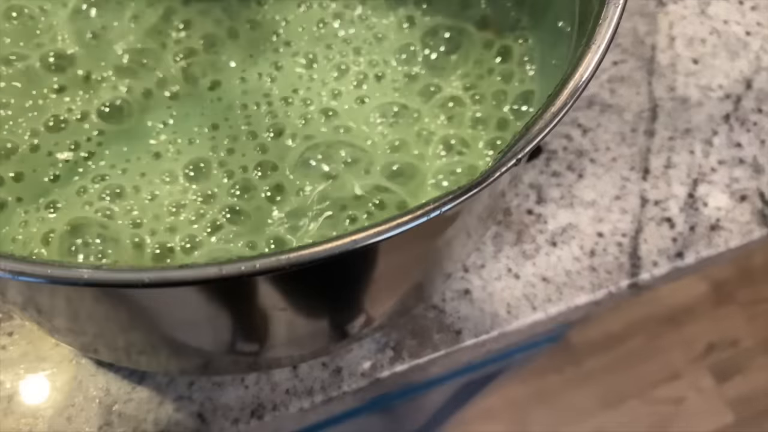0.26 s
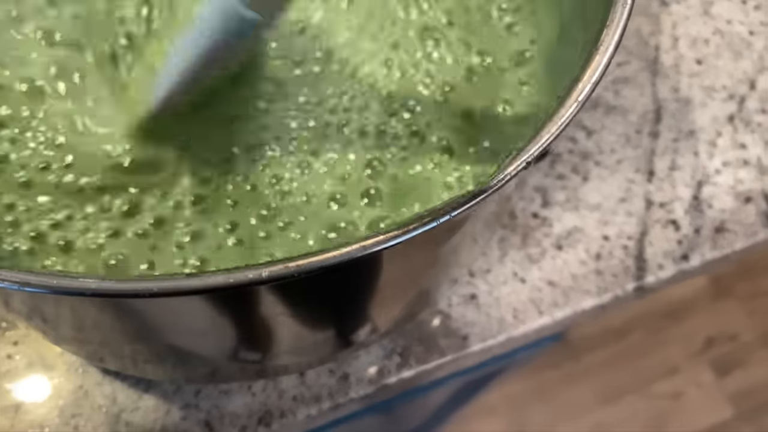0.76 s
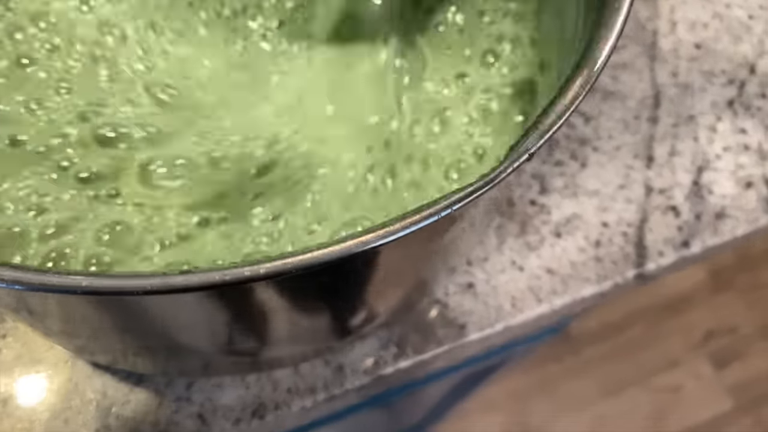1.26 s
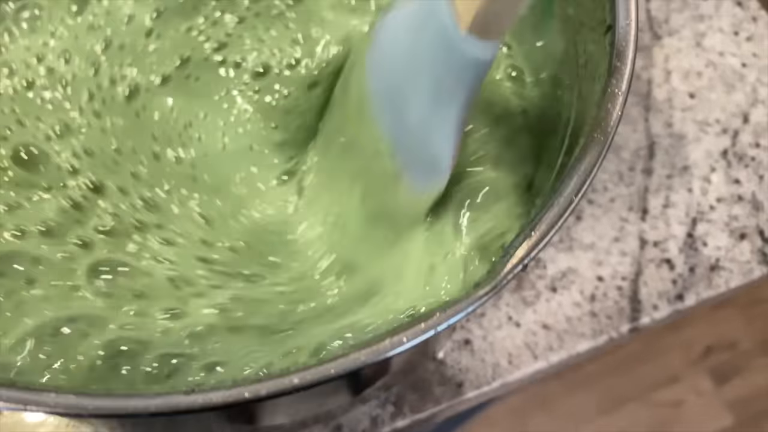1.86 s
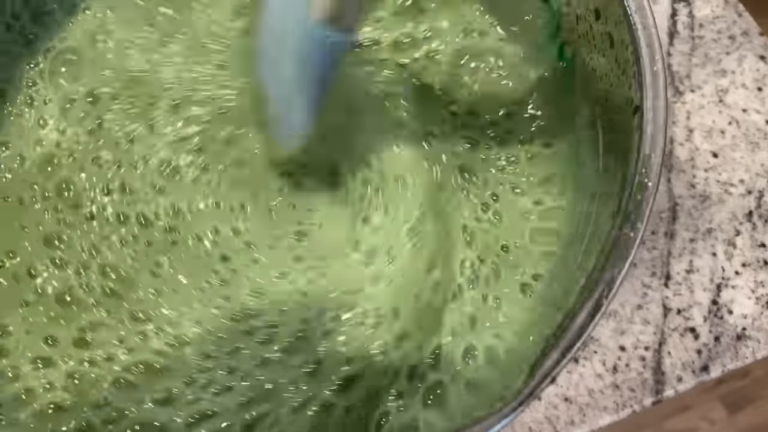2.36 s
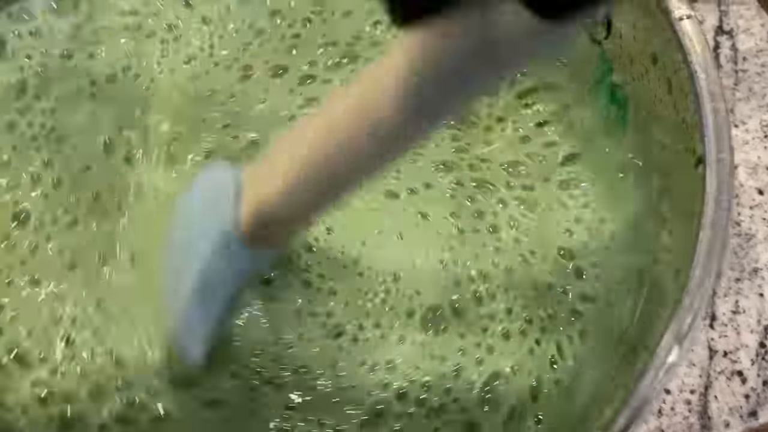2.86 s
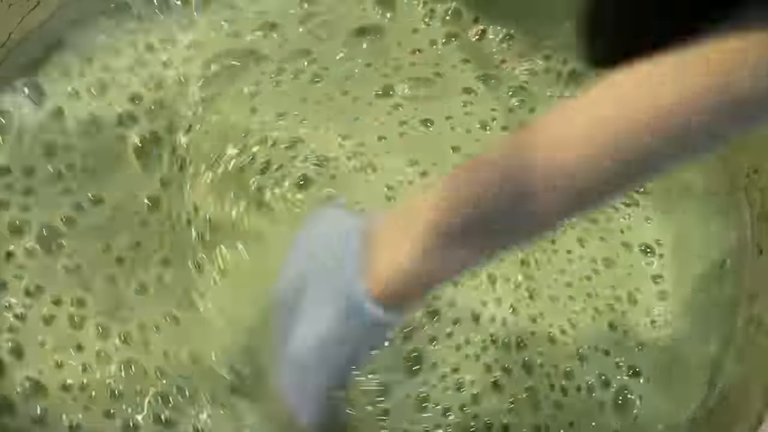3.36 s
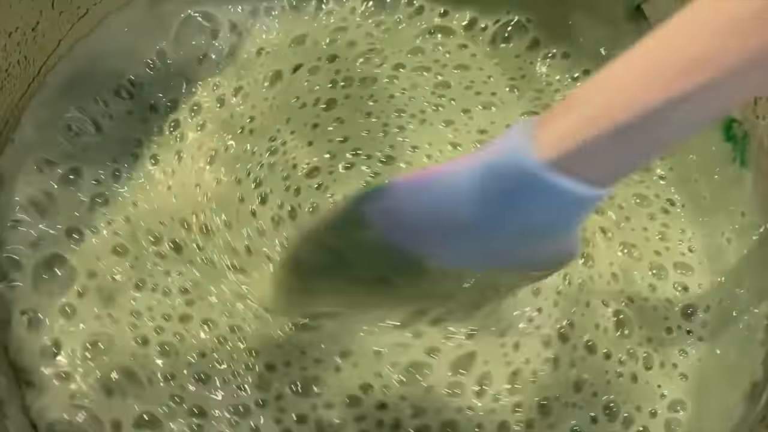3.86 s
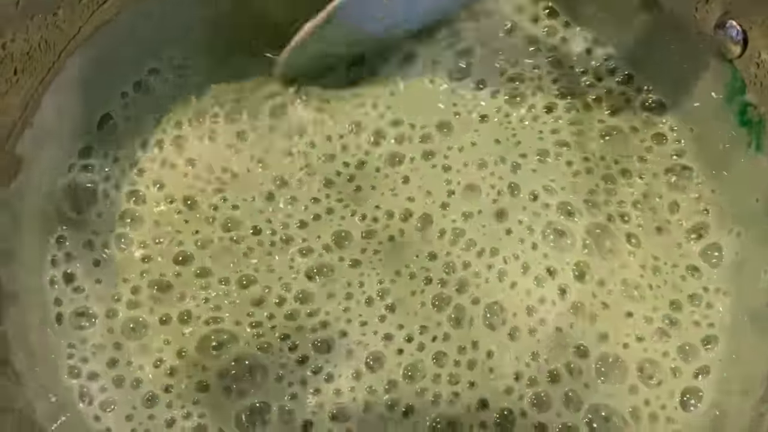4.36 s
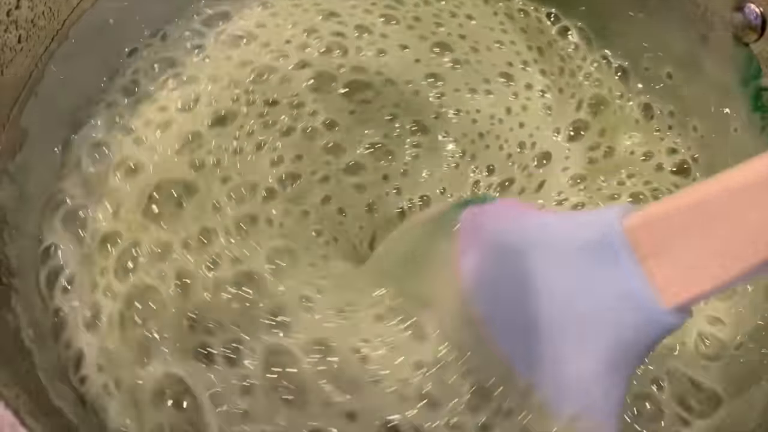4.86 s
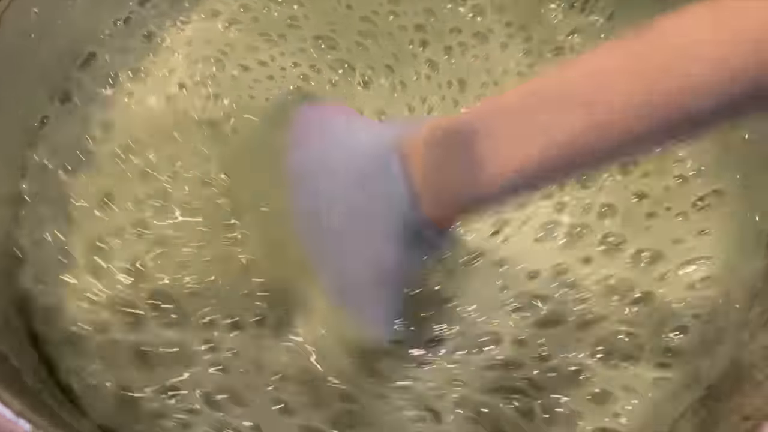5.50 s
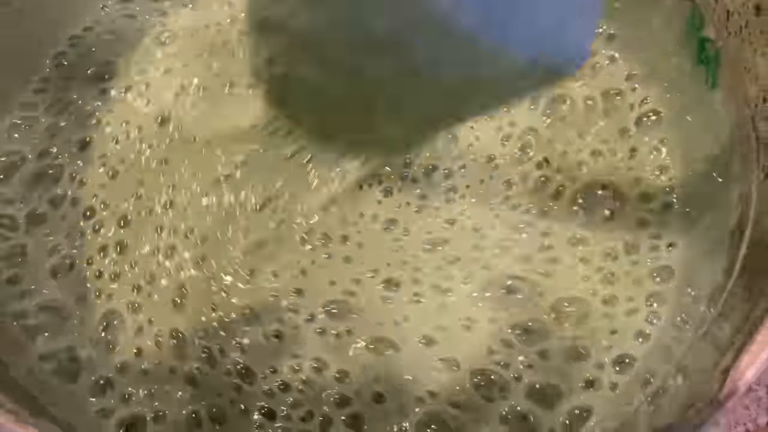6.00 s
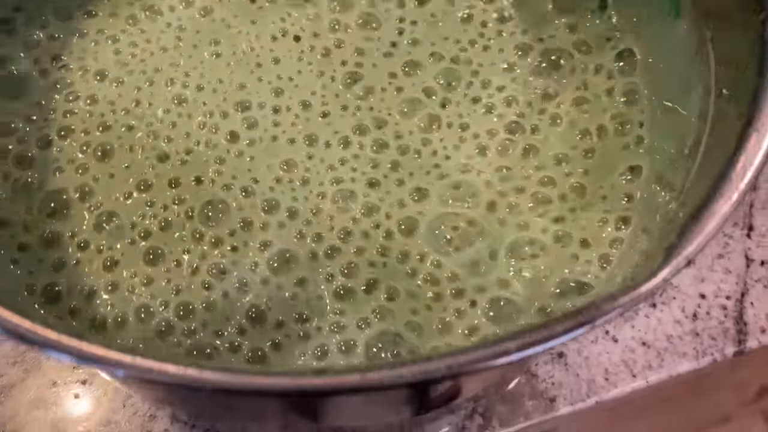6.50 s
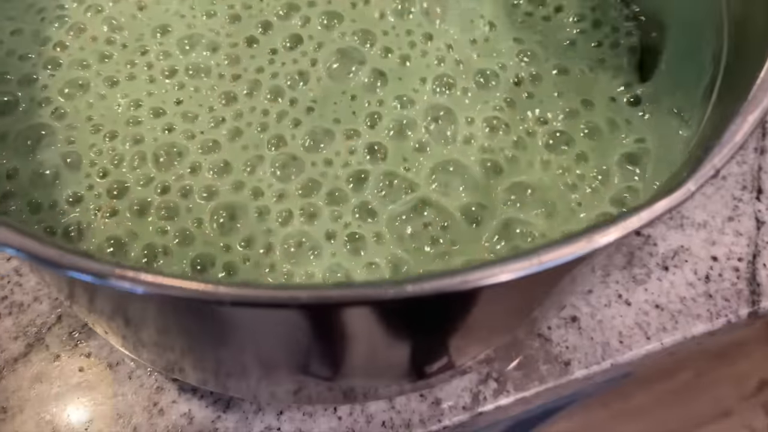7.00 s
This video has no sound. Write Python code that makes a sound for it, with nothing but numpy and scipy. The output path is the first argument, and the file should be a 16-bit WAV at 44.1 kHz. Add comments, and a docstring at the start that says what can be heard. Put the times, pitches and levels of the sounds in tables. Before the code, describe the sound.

A steady, very quiet fan rumble and low wavering hum lie under everything. Close to the microphone, slightly nearer the right, hot syrup foams in a steel pot with a fine, airy sizzle and dense tiny crackles. A soft spatula stirs it in short irregular swishes, with occasional muted wet smacks near 1.4, 2.1, 4.2 and 6.2 seconds. Small bright bubble pops tick all along. A barely audible thud opens the scene; dull knocks come at 0.7 and, softer, 1.0. From 2 seconds the crackle sharpens, snappiest between 3 and 4. At 4.4 one hard, hollow knock, by far the loudest event, rings briefly with a low boom and dying rattle in the small kitchen. A faint knock and fizzy surge follow at 4.9. The sizzle then eases, with brief spurts near 6.4 and a clear pop at 7.0, ending around 7.2.

```python
"""A fan rumbles and hums throughout: banded noise and wavering sines. Hot syrup foams in a steel pot from the
start, noise plus clumped blips in short surges, nearer the right microphone; a soft spatula stirs it with a
wash of noise and wet smacks. Pops sound all along as short blips with a bright snap.
Dull knocks, falling chirps with rings and rattle, come faintly at once, twice near 0.7-1 s, hardest
at 4.4 s and faintly at 4.9 s; the kitchen's feedback delays answer. Sharp snaps peak at 3-4 s, then thin out."""
import sys
import numpy as np
from scipy import signal
from scipy.fft import rfft, irfft, next_fast_len
from scipy.io import wavfile

SR = 44100
rng = np.random.default_rng(int(sys.argv[2]) if len(sys.argv) > 2 else 0)


def generate_wav(signal):
    """Clip the signal to [-1, 1] and save it as 16-bit WAV at the path in sys.argv[1]."""
    frames = np.transpose(np.atleast_2d(signal))
    scaled = np.clip(frames, -1, 1) * 32767
    pcm = np.round(scaled).astype(np.int16)
    wavfile.write(sys.argv[1], SR, pcm)


N = 319284
LEFT_LAG_S = 0.0002775   # the pot is nearer to the right microphone

# dull knocks: t/s, peak/dB, treble tilt/(dB/octave), boom/dB, clack shelf/dB
KNOCKS = [(0.053, -36.5, -13, 19, 0), (0.710, -19, -1, 2, -8), (1.038, -25.5, 2, 3, -8),
          (4.362, -9.5, 0, 0, 1), (4.927, -36.5, -4, 11.5, 3)]
# spectrum of the fizz: f/Hz, density/dB
SIZZLE_SPECTRUM = [(1400, -33), (2000, 8), (2500, -9.5), (3200, 2.5), (4400, 11), (6500, 4.5), (8000, -6),
                   (10200, 2.5), (12000, 4.5), (16000, -32.5)]
# left-right likeness of diffuse sound: f/Hz, likeness/(0..1)
LIKENESS = [(60, 0.17), (110, 0.29), (200, 0.98), (380, 0.48), (700, 0.15), (1500, 0.366), (4000, 0.057),
            (9000, 0.09), (15000, 0.15)]


def from_db(db):
    """Gain of a level in dB."""
    return 10 ** (np.asarray(db) / 20)


def rms_one(x):
    """Scaled to rms 1."""
    return x / np.sqrt(np.mean(x ** 2) + 1e-20)


def at_hz(points, hz):
    """A spectrum read on a log-frequency axis."""
    points = np.array(points)
    return np.interp(np.log(hz), np.log(points[:, 0]), points[:, 1])


def drift(rate_hz):
    """Slow chance of rms 1: noise at every 40th sample through a double one-pole low-pass."""
    step = 40
    r = np.exp(-2 * np.pi * rate_hz * step / SR)
    noise = rng.standard_normal(N // step + 2002)
    slow = signal.lfilter([1], [1, -2 * r, r * r], noise)[2000:]   # settled part
    return np.interp(np.arange(N) / step, np.arange(len(slow)), rms_one(slow))


def ring(clicks, hz, t60_s):
    """A two-pole resonator: a unit click sets a decaying sine of height 1 ringing."""
    r = from_db(-60 / (t60_s * SR))
    w = 2 * np.pi * hz / SR
    return signal.lfilter([0, np.sin(w)], [1, -2 * r * np.cos(w), r * r], clicks + 1e-18)


def placed(x, pan_db, lag_s):
    """One sound at both microphones, the left one late; pan_db is left over right."""
    hz = np.arange(len(x) // 2 + 1) * SR / len(x)
    late = irfft(rfft(x) * np.exp(-2j * np.pi * hz * lag_s), len(x))
    return np.array([late * from_db(pan_db / 2), x * from_db(-pan_db / 2)])


def banded_noise(spectrum, patchy_db, rate_hz, lag_s):
    """Third-octave bands of stereo noise, each with its own level, flicker and likeness; rms 1."""
    low_hz, high_hz = spectrum[0][0], spectrum[-1][0]
    edges = low_hz * 2 ** np.arange(0, np.log2(high_hz / low_hz) + 1 / 3, 1 / 3)
    shared, own = 0, 0
    together = drift(rate_hz)   # flicker common to all bands
    white = rng.standard_normal((2, 3, N))   # neighbouring bands take different noise
    for k, (low, high) in enumerate(zip(edges, edges[1:])):
        band_pass = signal.butter(2, [low, min(high, 20000)], "band", fs=SR, output="sos")
        band = signal.sosfilt(band_pass, white[k % 2])
        hz = np.sqrt(low * high)
        alike = np.clip(at_hz(LIKENESS, hz), 0, 1)
        gain = from_db(at_hz(spectrum, hz) + patchy_db * (together + 2.6 * drift(rate_hz)))
        shared = shared + gain * np.sqrt(alike) * band[0]
        own = own + gain * np.sqrt(1 - alike) * band[1:]
    return rms_one(placed(shared, 0, lag_s) + own)


def hum():
    """Motor tones that waver a little in level and phase."""
    # f/Hz, rms level/dB before wavering, wavering rate/Hz
    motor_tones = [(62, -74, 13.6), (114.5, -74, 2.67), (206.6, -72, 9.5), (390.6, -62, 1.46)]
    t = np.arange(N) / SR
    total = 0
    for hz, db, rate_hz in motor_tones:
        level = from_db(db + 2.0 * drift(rate_hz)) * np.sqrt(2)
        total = total + level * np.sin(2 * np.pi * hz * t + 0.96 * drift(rate_hz))
    return total * from_db([[1], [-1]])


def fan():
    """Low banded noise is the rumble; the motor hums on top."""
    # f/Hz, density/dB
    rumble_spectrum = [(15, -56), (25, -27), (59, -6), (140, -3), (204, 4), (325, -4.5), (389, 17.5),
                       (413, -13.5), (452, -16), (600, -8), (900, -56), (1170, -33), (1980, -120)]
    rumble = banded_noise(rumble_spectrum, patchy_db=0.12, rate_hz=3.9, lag_s=0)
    return from_db(-59.5) * rumble * from_db([[.8], [-.8]]) + hum()


def kitchen(x):
    """Ten feedback delays a side, fed by the right signal; loss per round follows the decay table."""
    # f/Hz, t60/s
    decay = [(60, 0.88), (300, 0.53), (1000, 0.56), (2200, 0.26), (4000, 0.41), (10000, 0.039)]
    size = next_fast_len(N + SR)
    hz = np.arange(size // 2 + 1) * SR / size + 1e-3
    t60_s = at_hz(decay, hz)
    echoes = np.zeros((2, size // 2 + 1), complex)
    for k, lag_s in enumerate(rng.uniform(0.0098, .04, 20)):
        round_trip = from_db(-60 * lag_s / t60_s) * np.exp(-2j * np.pi * hz * lag_s)
        echoes[k % 2] += (-1) ** (k // 2) * round_trip / (1 - round_trip)
    alike = np.clip(at_hz(LIKENESS, hz), 0, 1)   # the two sides are most alike near 200 Hz
    # the far walls hear more of the treble
    heard = rfft(x[1], size) * from_db(2.0 * np.log2(np.clip(hz, 50, 2000) / 500))
    return irfft(heard * (alike * echoes[::-1] + echoes), size)[:, :N]


def rattle():
    """After each knock pot and worktop rattle on as a rough noise that dies away."""
    # f/Hz, density/dB
    rattle_spectrum = [(59, -43), (100, -10), (306, -2.5), (557, -17), (665, -2.5), (1070, -12.5),
                       (1250, -12.5), (1930, -14.5), (2600, -33), (3380, -61), (5720, -120)]
    below_blow_db, delay_s, rise_s, t60_s = -22, .005, .004, .47
    t, level = np.arange(N) / SR, np.zeros(N)
    for s, db, *_ in KNOCKS:
        age = np.maximum(t - s - delay_s, 0)
        level += from_db(db + below_blow_db - 60 * age / t60_s) * (1 - np.exp(-age / rise_s))
    return level * banded_noise(rattle_spectrum, patchy_db=1.5, rate_hz=26.0, lag_s=LEFT_LAG_S)


def room_boom(shove):
    """A slow ring less a quick one: the lowest room modes build up, then die."""
    # f/Hz, t60/s, left/dB, right/dB
    boom_modes = [(61.4, 0.37, -1, -3.5), (62, 0.28, -10, -15), (116.4, 0.13, -23, 6.5)]
    swell_s = 0.03
    boom = 0
    for hz, t60_s, left_db, right_db in boom_modes:
        quick_t60_s = 1 / (1 / t60_s + 1 / (swell_s * np.log(1000)))
        swell = ring(shove, hz, t60_s) - ring(shove, hz, quick_t60_s)
        boom = boom + from_db([[left_db], [right_db]]) * swell
    return boom


def knocks():
    """A blow spreads as a bending wave, so it arrives as a fast falling chirp; a few modes ring on."""
    # colour at each microphone: f/Hz, left/dB, right/dB
    knock_colour = np.array([(60, -36, -32), (100, -19, -15), (190, -2, -3), (300, 2, 1), (420, -2, -3),
                             (610, -17, -11), (750, -10, -13), (900, -3, -13), (1060, 1, -5),
                             (1250, -6, -10), (1500, -16, -13), (1820, -7, -17), (2000, -11, -19),
                             (2350, -26, -33), (3900, -24, -30), (9000, -50, -50)])
    # longer rings: f/Hz, width/Hz, left/dB, right/dB, sign at the right
    knock_rings = [(640, 24, -9, -7, -0.77), (697, 31.3, -0.5, -10, -0.87), (1090, 72, -20, -3.5, 1),
                   (1303, 46, -30.5, -8, 0.82), (1740, 30, -21, -14, -0.69)]
    bending_s = .004   # travel time at 1 kHz; lower tones come later
    head_s, right_lag_s = .01, np.array([[0], [.00013]])
    clack_hz, boom_below_blow_db = 1500, -20
    size = 4096
    out, shove = np.zeros((2, N + size)), np.zeros(N)
    hz = np.arange(size // 2 + 1) * SR / size + 1e-3
    bending_phase = 4 * np.pi * bending_s * np.sqrt(1000 * hz)
    travel = np.exp(-1j * bending_phase - 2j * np.pi * hz * (head_s + right_lag_s))
    body = from_db([at_hz(knock_colour[:, [0, side]], hz) for side in (1, 2)])
    for top_hz, width_hz, left_db, right_db, sign in knock_rings:
        resonance = 1 / (1 + 1j * (hz ** 2 - top_hz ** 2) / (hz * width_hz))
        body = body + from_db([[left_db], [right_db]]) * [[1], [sign]] * resonance
    for s, db, tilt_db, boom_db, clack_db in KNOCKS:
        tilt = tilt_db * np.log2(np.clip(hz, 100, 4000) / 500)
        clack = clack_db / (1 + (clack_hz / hz) ** 6)
        blow = irfft(travel * body * from_db(tilt + clack), size)
        at = round((s - head_s - .4 * bending_s) * SR)
        out[:, at:at + size] += from_db(db) * blow / np.abs(blow.mean(0)).max()
        shove[round((s + .008) * SR)] = from_db(db + boom_db + boom_below_blow_db)
    return out[:, :N], room_boom(shove)


def stirring_wash():
    """The spatula's wash through the syrup: flickering banded noise, a little louder at the left."""
    # f/Hz, density/dB
    wash_spectrum = [(260, -28), (450, -7), (754, -5.5), (884, -9), (1350, -0.5), (2420, -11.5),
                     (3000, -5.5), (3900, -16), (6600, -120)]
    wash = banded_noise(wash_spectrum, patchy_db=1.5, rate_hz=101.0, lag_s=LEFT_LAG_S)
    return wash * from_db([[.6], [-.6]])


def surges():
    """Short surges of the foam: each lifts the sizzle and raises or slightly lowers the wash; dB."""
    # centre t/s, half length/s, sizzle rise/dB, wash change/dB
    surge_events = [(0.14, 0.021, 10, -1), (.33, 0.057, 4, 6), (0.501, 0.039, 7.5, 7.5),
                    (0.62, 0.014, 10.5, 3), (0.709, 0.028, 8, 15), (0.957, 0.029, 4.5, 2.5),
                    (1.093, 0.03, 5, 0), (1.24, 0.051, 3, 1), (1.332, 0.012, 12.5, 1),
                    (1.433, 0.05, 2.5, 4.5), (1.748, 0.017, 6.5, 6.5), (1.862, 0.046, 4.5, 2),
                    (2.08, 0.034, 3, 1), (2.207, 0.056, 3.5, 1.5), (2.61, 0.068, 3.5, 4),
                    (3.067, 0.06, 6, 8.5), (3.326, 0.036, 3.5, 8.5), (3.522, 0.039, 9, 13),
                    (3.806, 0.063, 1.5, 6.5), (4.19, 0.025, 4, 10.5), (4.472, 0.018, 7, 2),
                    (4.642, 0.019, 3, 2), (4.943, 0.022, 14, 12), (5.255, 0.048, 3, 4.5),
                    (5.5, .05, 0.5, 4), (5.71, .05, 5, 6.5), (6.187, 0.041, 3.5, 1.5),
                    (6.252, 0.011, 8, 16.5), (6.425, 0.025, 17, 5.5), (6.583, 0.021, 3.5, 0.5),
                    (6.726, 0.018, 6.5, -2), (7.012, 0.013, 8, 14.5), (7.22, 0.023, 5, 1)]
    squareness = 2.5   # 2 is a bell, more is a plateau
    t, out = np.arange(N) / SR, np.zeros((2, N))
    for s, half_s, sizzle_db, wash_db in surge_events:
        near = slice(max(round((s - .3) * SR), 0), round((s + .3) * SR))
        swell = np.exp(-np.abs((t[near] - s) / half_s) ** squareness)
        out[:, near] += np.outer([sizzle_db, wash_db], swell)
    return out


def crackle(per_s, spread_db, cycles, tilt_db):
    """Small bubbles burst in clumps all over the foam, each a blip of a few cycles; rms 1."""
    sizes = from_db(spread_db * np.minimum(rng.exponential(1, N), 4)) * rng.choice([-1, 1], N)
    born = rng.random(N) < per_s * from_db(5 * drift(25)) / SR
    pitches_hz = np.geomspace(2200, 15500, 24)
    dealt = rng.integers(0, 24, N)   # pitch of each bubble
    out = 0
    # three spots in the foam: pan/dB, lag/s
    for spot, (pan_db, lag_s) in enumerate(rng.normal([-1, LEFT_LAG_S], [3, 2.5e-5], (3, 2))):
        blips = 0
        for k in range(spot, 24, 3):
            hz = pitches_hz[k]
            t60_s = cycles / hz
            swelling = ring(ring(sizes * born * (dealt == k), hz, t60_s), hz, t60_s)
            gain = from_db(at_hz(SIZZLE_SPECTRUM, hz) + tilt_db * np.log2(hz / 4000)) * np.sqrt(hz)
            blips = blips + gain * rms_one(swelling)
        out = out + placed(blips, pan_db, lag_s)
    return rms_one(out)


def syrup():
    """Sizzling foam, sharp snaps and stirring wash, all following the state of the foam."""
    # foam between surges: t/s, sizzle/dB, wash above sizzle/dB, sharp snaps above sizzle/dB
    foam_states = [(0.0, -65.5, 6.5, -22), (0.12, -65.5, 6.5, -18), (0.48, -61, 2.5, -22),
                   (1.79, -62, 1.5, -15), (2.04, -60, 3.5, -4), (2.9, -58.5, -1.5, -5),
                   (3.25, -57, -3, -2.5), (4.11, -60.5, -2, -2.5), (4.49, -56.5, 1, -15),
                   (4.72, -60.5, 0, -24), (5.57, -59, -1, -12), (6.01, -63, -0.5, -12),
                   (6.92, -63.5, 2, -27), (7.24, -65, -4, -17)]
    s, *columns = np.transpose(foam_states)
    sizzle_db, wash_db, sharp_db = (np.interp(np.arange(N) / SR, s, c) for c in columns)
    sizzle_rise_db, wash_change_db = surges()
    fizz = banded_noise(SIZZLE_SPECTRUM, patchy_db=2.0, rate_hz=140.0, lag_s=LEFT_LAG_S)
    foam = from_db(1.0) * fizz
    foam += from_db(0.5) * crackle(per_s=1400.0, spread_db=6.0, cycles=5.7, tilt_db=6.5)
    # sharper, broader snaps
    foam += from_db(sharp_db) * crackle(per_s=430.0, spread_db=1.0, cycles=0.57, tilt_db=4.5)
    surging_foam = from_db(sizzle_rise_db) * foam
    surging_wash = from_db(wash_db + wash_change_db) * stirring_wash()
    return from_db(sizzle_db) * (surging_foam + surging_wash)


def bursts(events, cycles, echo_db, spray_db):
    """Blips swell and die in a few cycles amid like-pitched noise, with two echoes off the pot wall."""
    size = 1024
    out, t = np.zeros((2, N + size)), np.arange(size) / SR - .004
    echoes_s = rng.uniform(0.0013, 0.0059, (len(events), 2))

    def blip(t, hz):
        """A cosine under a bell."""
        return np.exp(-(t * hz / cycles) ** 2) * np.cos(2 * np.pi * hz * t)

    for (s, db, hz, pan_db), (echo_s, inverted_echo_s) in zip(events, echoes_s):
        band_pass = signal.butter(1, [hz / 2, min(2 * hz, 20000)], "band", fs=SR)
        noise = signal.lfilter(*band_pass, rng.standard_normal(size))
        spray = from_db(spray_db) * rms_one(noise) * np.exp(-np.abs(t) / 0.001)
        echoes = from_db(echo_db) * (blip(t - echo_s, hz) - blip(t - inverted_echo_s, hz))
        sound = blip(t, hz) + spray + echoes
        at = round((s - .003) * SR)
        out[:, at:at + size] += from_db(db) * placed(sound, pan_db, LEFT_LAG_S)
    return out[:, :N]


def spatula_smacks():
    """Wet smacks of the spatula in the syrup: bursts of low pitch and little spray."""
    # t/s, peak/dB, f/Hz, left over right/dB
    smack_events = [(0.125, -45.5, 1690, 24.5), (0.153, -48, 1790, 23), (1.425, -37.5, 1320, 7),
                    (2.112, -35, 1180, 3), (4.194, -36, 1180, -3), (5.517, -45, 1370, 13),
                    (5.68, -40.5, 1250, -11), (6.2465, -35, 1335, -3), (6.2525, -45.5, 1000, -11),
                    (7.017, -53, 753, -4)]
    return bursts(smack_events, cycles=0.95, echo_db=-10.0, spray_db=-34.0)


def snaps(events):
    """The very short bright snap in each pop, as of a bubble's skin tearing: a cosine under a bell."""
    snap_hz, snap_s = 10600, .00022
    size = 256
    out, t = np.zeros((2, N + size)), np.arange(size) / SR - .002
    snap = rms_one(np.exp(-(t / snap_s) ** 2) * np.cos(2 * np.pi * snap_hz * t))
    for s, db, hz, pan_db, snap_db in events:
        at = round((s - .001) * SR)
        out[:, at:at + size] += from_db(snap_db) * placed(snap, pan_db, LEFT_LAG_S)
    return out[:, :N]


def stray_pops():
    """Smaller pops by chance; same columns as the larger ones."""
    count = 50
    s, z = rng.uniform(.01, N / SR, count), rng.standard_normal((count, 4))
    level_db = -53 + 4.5 * z[:, 0]
    pitch_hz = 3800 * 2 ** (0.9 * z[:, 1])
    pan_db = 9 * z[:, 2]
    snap_db = -64 + 4.5 * z[:, 3]
    return np.column_stack([s, level_db, pitch_hz, pan_db, snap_db])


def pops():
    """Larger and stray pops, two of them the click in a knock (0.71 and 4.36 s): blip, spray and snap."""
    # t/s, peak/dB, f/Hz, left over right/dB, snap rms/dB
    pop_events = [(0.0544, -38.5, 4400, -2, -75), (0.126, -38.5, 3400, -2.0, -64),
                  (0.1526, -43, 2710, -0.5, -55), (0.2189, -42, 4670, -3, -56), (0.485, -43, 4660, 8, -73),
                  (0.4945, -31.5, 4330, -2, -73), (0.6015, -38, 5080, 2.0, -61),
                  (0.6525, -52, 4830, 9, -74), (0.6653, -37, 4560, -1, -68), (0.7098, -44, 2340, -7, -66),
                  (0.8905, -40, 4800, -1.0, -63), (0.9649, -35, 4770, 1, -54), (1.3332, -44, 4200, 2, -57),
                  (1.4257, -33.5, 8060, -3, -46), (1.728, -42, 4300, -0.5, -52), (1.881, -39, 4400, 4, -51),
                  (1.9495, -48, 4600, 0.5, -71), (1.9644, -34, 4500, -9, -72),
                  (2.0163, -44, 2350, 0.0, -81), (2.0163, -41.5, 6900, -3, -73),
                  (2.0273, -31, 4300, 6.5, -79), (2.1262, -30, 5800, 14, -63),
                  (2.1828, -46, 5290, 3.0, -51), (2.1853, -42, 7700, 0.0, -43),
                  (2.2078, -42, 3940, 0.5, -50), (2.3395, -45, 3950, -0.5, -47.5),
                  (2.499, -43, 3360, -1.0, -49), (2.5247, -36, 6100, -6, -54),
                  (2.5688, -42, 4080, 0.0, -50), (2.606, -36.5, 7240, 2, -47), (2.6503, -38, 4020, 3, -75),
                  (2.6658, -38.5, 3100, 0, -79), (2.9966, -42, 3520, 0.5, -65),
                  (3.038, -40.5, 3220, 2.0, -54), (3.0565, -41, 3200, 0.5, -44.5),
                  (3.2793, -52, 3380, 0.0, -53), (3.2931, -38, 4470, -1.5, -50),
                  (3.4096, -34, 8000, -2, -46), (3.4454, -39, 3330, 4, -55), (3.472, -35, 5940, -6, -47),
                  (3.489, -36.5, 3200, 0.0, -47), (3.5318, -34, 3130, 0, -53),
                  (3.5993, -34.5, 4350, 3, -48), (4.0417, -50, 4900, -1.5, -52),
                  (4.1202, -43.5, 3090, -4, -52), (4.1929, -40, 3230, 8, -59),
                  (4.364, -29.5, 3700, -4, -69), (4.4308, -35, 4960, -2, -52), (4.4523, -46, 2860, 2, -61),
                  (4.4648, -31, 6750, -7, -64), (4.5181, -38, 7100, -8, -65), (4.6694, -35, 3500, 0, -63),
                  (4.8175, -45, 3900, -0.5, -53), (4.87, -43, 5110, -1.5, -69), (4.907, -49, 6610, 0, -54),
                  (4.9243, -36, 2850, 1, -38.5), (5.1901, -44, 3420, -0.5, -69),
                  (5.2465, -43.5, 3800, -0.5, -48), (5.3228, -45, 3360, -0.5, -46),
                  (5.4833, -29.5, 6000, -16, -65), (5.5184, -44, 3180, 6, -62),
                  (5.5334, -32.5, 6400, -3.0, -44), (5.571, -56, 3290, 0.0, -49.5),
                  (5.6705, -34.5, 6560, -13, -77), (5.7239, -34, 4030, -4, -70),
                  (5.8716, -47, 3860, -1.5, -49.5), (6.1168, -50, 3180, -2, -58),
                  (6.1339, -49, 3300, 0.5, -46), (6.2457, -40, 3200, 0.5, -66), (6.4009, -47, 3270, 4, -67),
                  (6.415, -35, 6530, 6, -59), (6.4284, -41, 3200, -1, -43), (6.4545, -38, 4250, -7, -59),
                  (6.6662, -50, 3070, -2.5, -76), (6.68, -37.5, 4260, -1, -75),
                  (6.7234, -47, 3740, 0.0, -68), (6.7393, -39, 3640, -0.5, -80),
                  (6.8254, -56, 3100, -0.5, -49.5), (6.8438, -38, 7130, -8, -67),
                  (6.9624, -37, 6200, -11, -67), (7.0174, -44, 2460, -3, -50),
                  (7.0174, -25.5, 4850, 1, -54), (7.0464, -37, 4700, 0, -54), (7.1922, -42, 5070, 10, -57)]
    events = np.vstack([pop_events, stray_pops()])
    return bursts(events[:, :4], cycles=1.47, echo_db=-19.5, spray_db=-6.5) + snaps(events)


def scene():
    """Fan, knocks, stirred foam and pops together, with the kitchen's answer."""
    blows, boom = knocks()
    pops_and_smacks = pops() + spatula_smacks()
    # share of each that the kitchen returns
    room = kitchen(from_db(-29) * blows + from_db(-27.5) * pops_and_smacks)
    return fan() + room + rattle() + boom + blows + syrup() + pops_and_smacks


def record(dry):
    """The microphone housing cuts two dips into the treble; the top is cut steeply."""
    # f/Hz, width/Hz, depth/dB
    housing_dips = [(8660, 150, -27.5), (13780, 2480, -21)]
    cutoff_hz, ripple_db, stop_db = 15780, .5, 60
    hz = np.arange(N // 2 + 1) * SR / N
    dips_db = sum(db * np.exp(-((hz - dip_hz) / width_hz) ** 2) for dip_hz, width_hz, db in housing_dips)
    dipped = irfft(rfft(dry) * from_db(dips_db), N)
    low_pass = signal.ellip(12, ripple_db, stop_db, cutoff_hz, fs=SR, output="sos")
    return signal.sosfilt(low_pass, dipped)


dry = scene()
out = record(dry)
generate_wav(out)
```